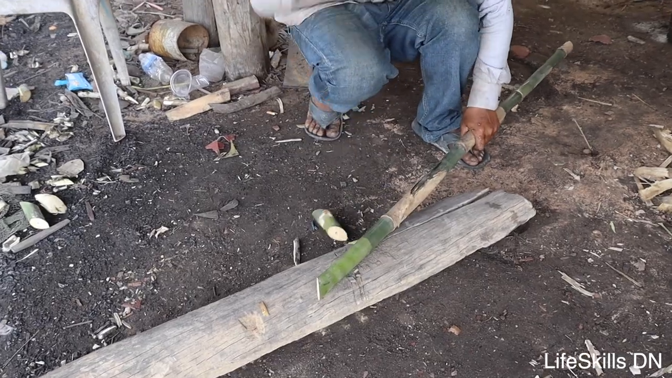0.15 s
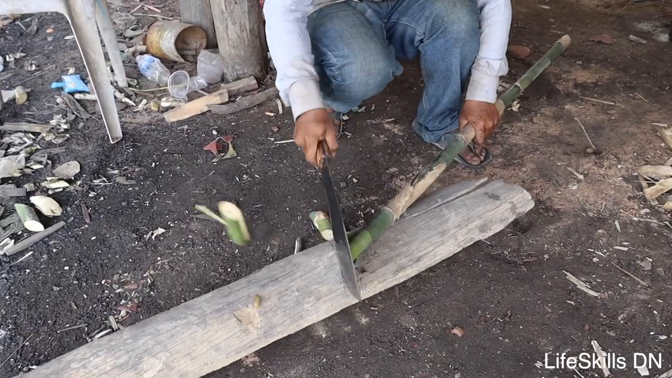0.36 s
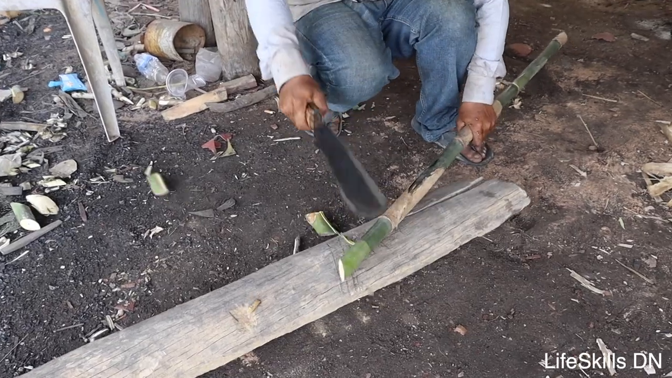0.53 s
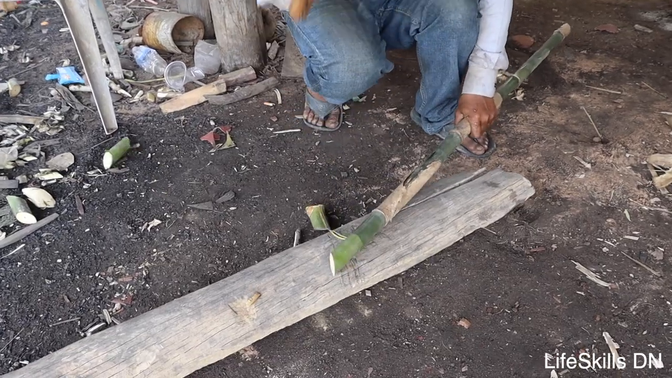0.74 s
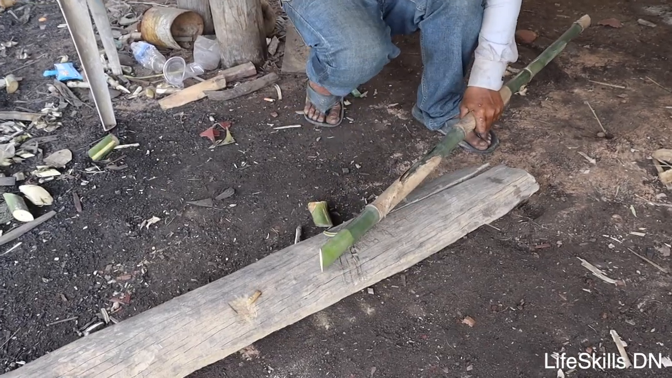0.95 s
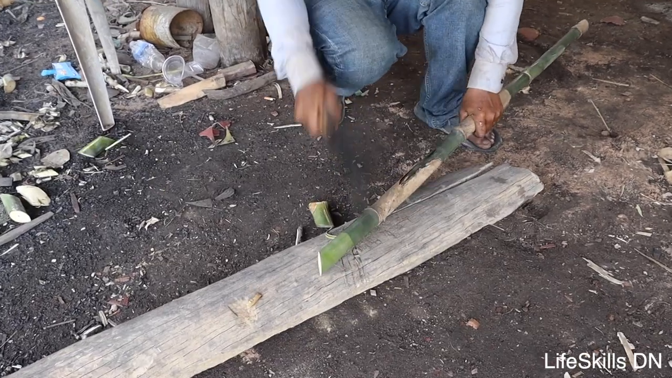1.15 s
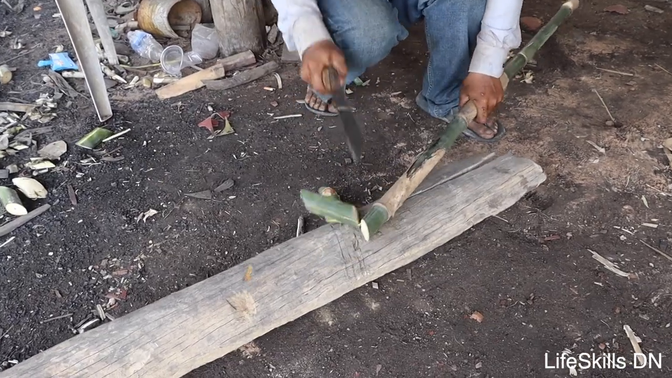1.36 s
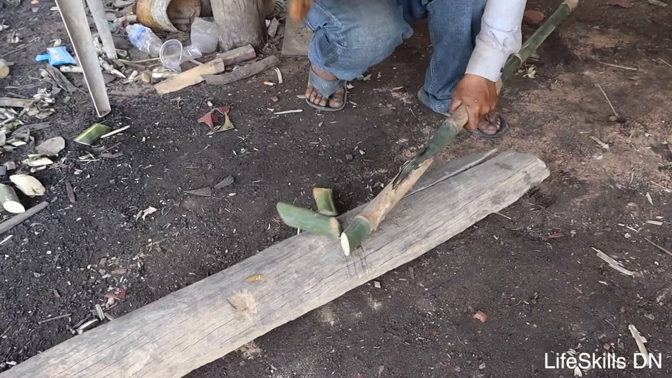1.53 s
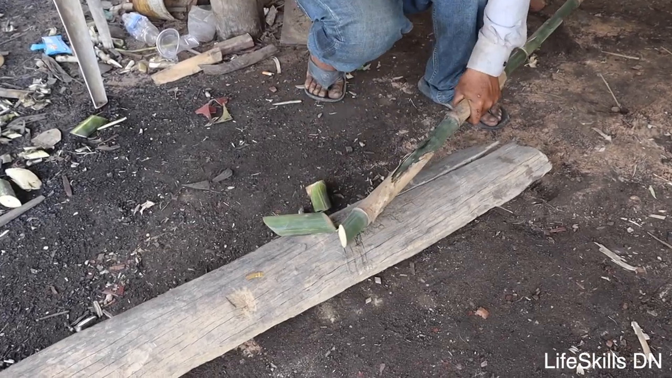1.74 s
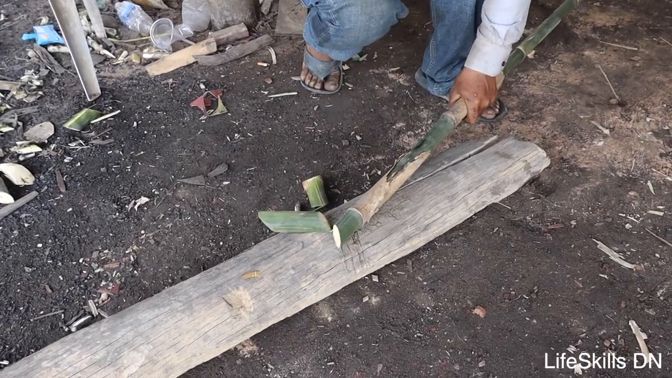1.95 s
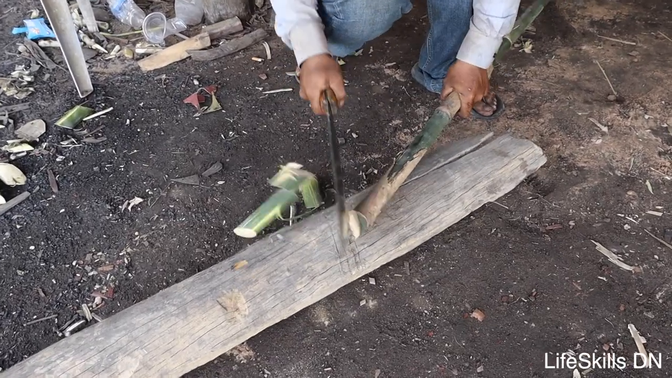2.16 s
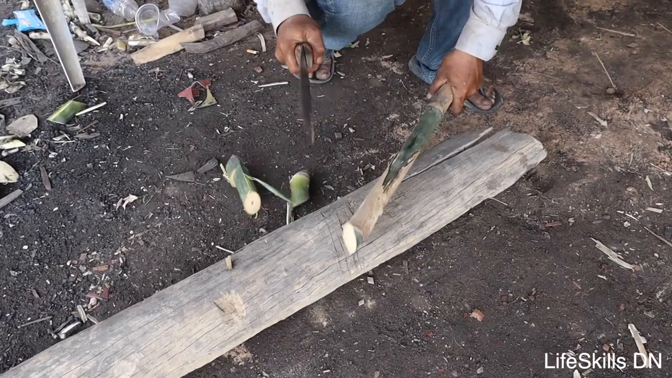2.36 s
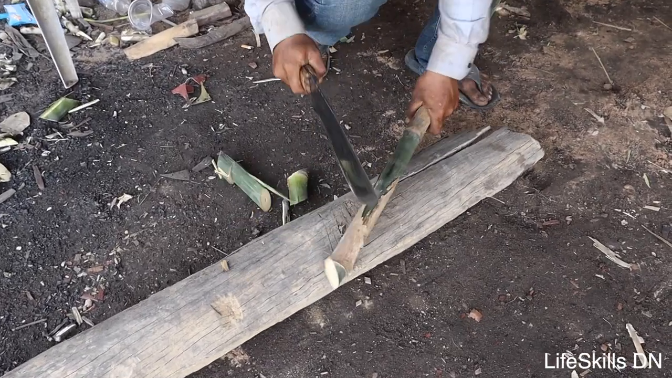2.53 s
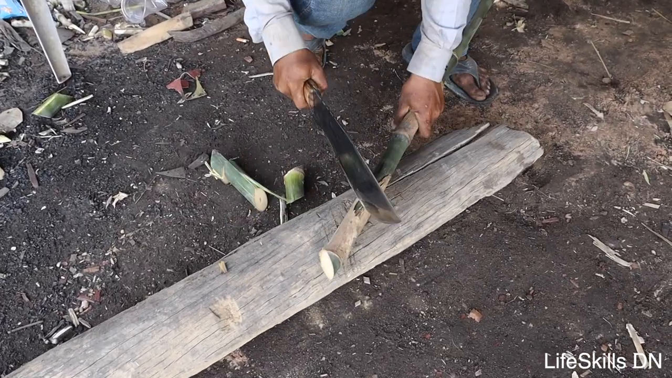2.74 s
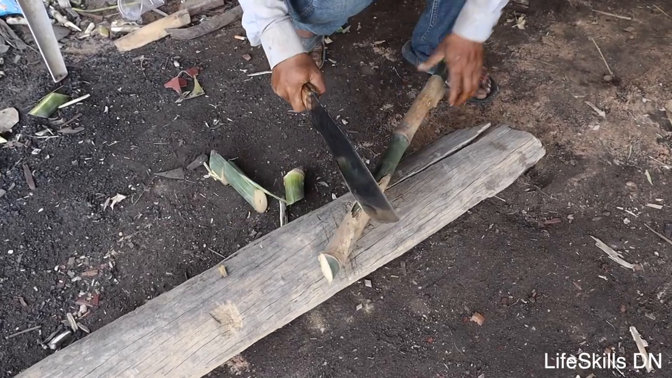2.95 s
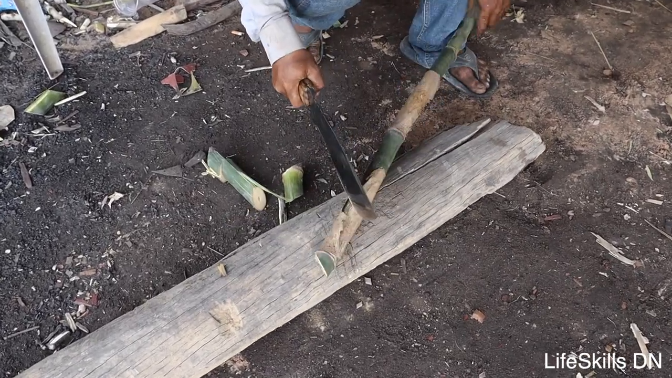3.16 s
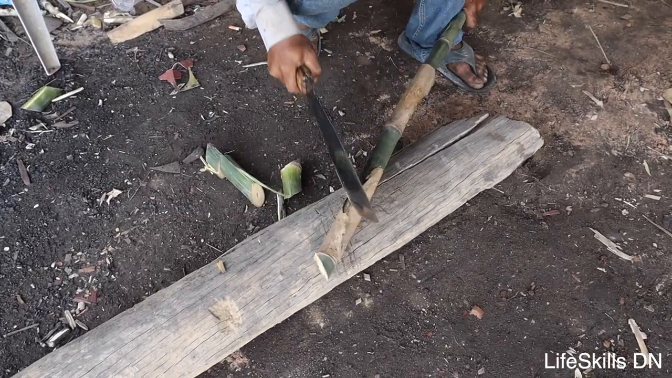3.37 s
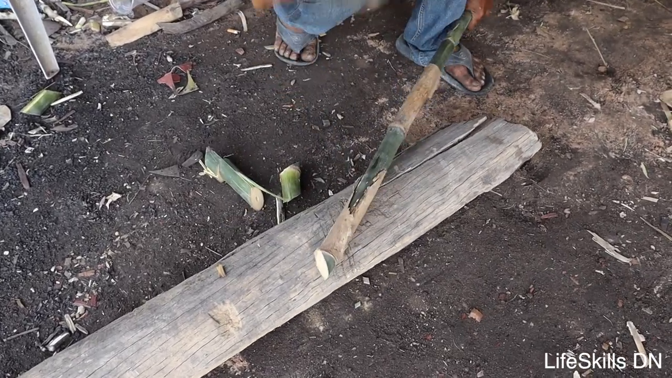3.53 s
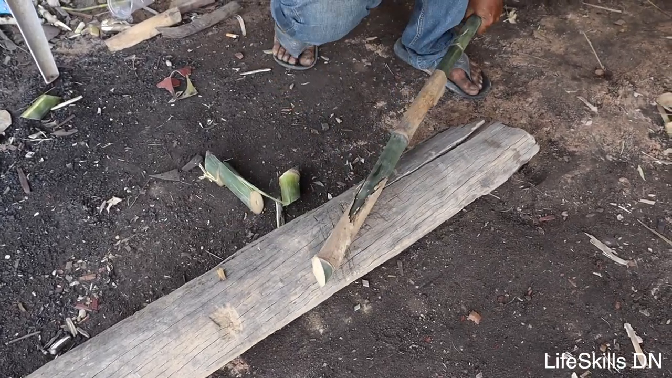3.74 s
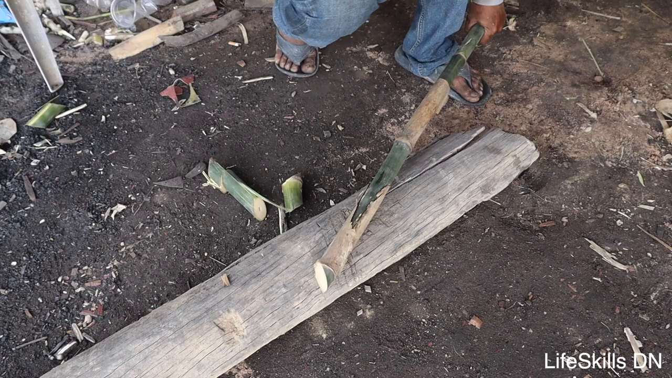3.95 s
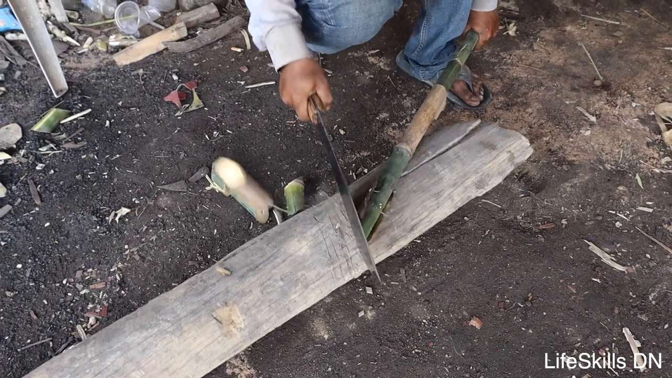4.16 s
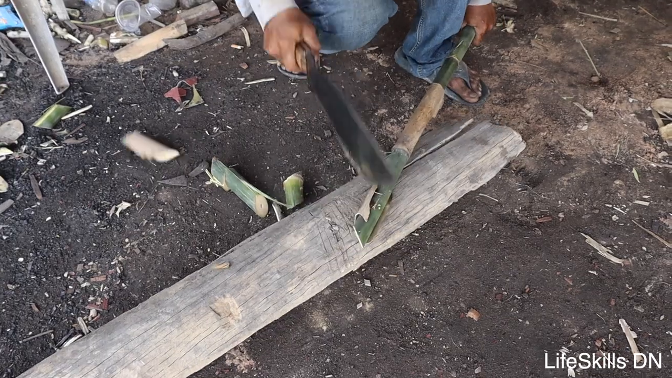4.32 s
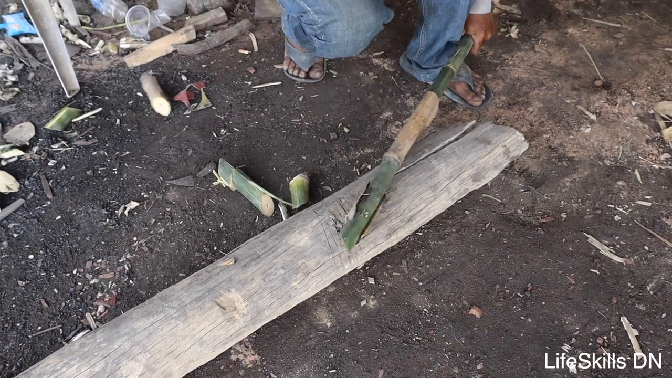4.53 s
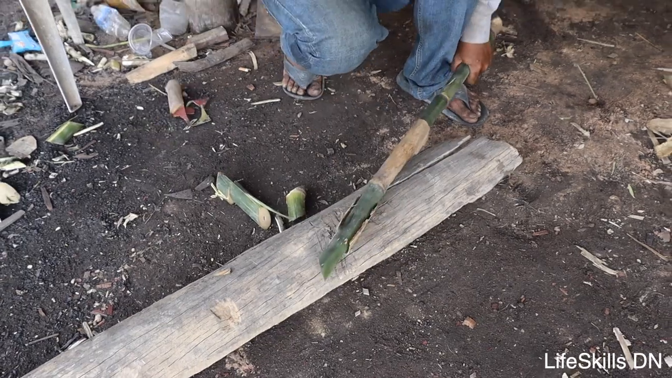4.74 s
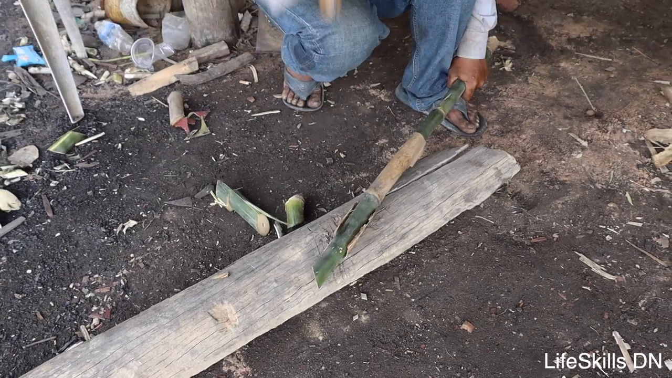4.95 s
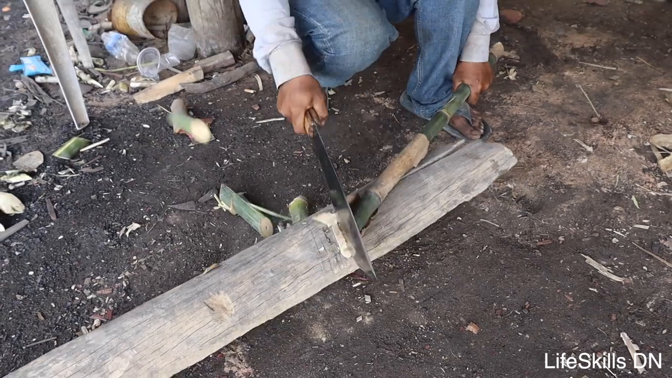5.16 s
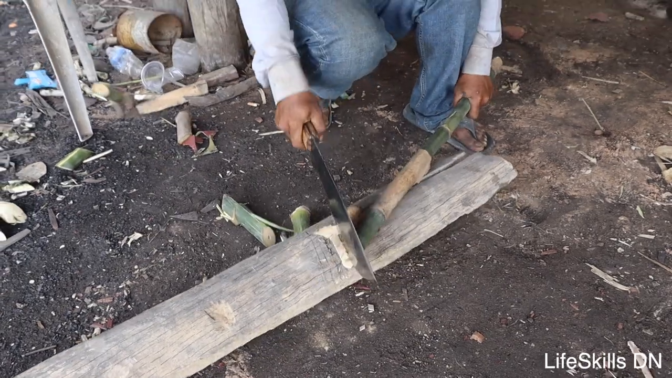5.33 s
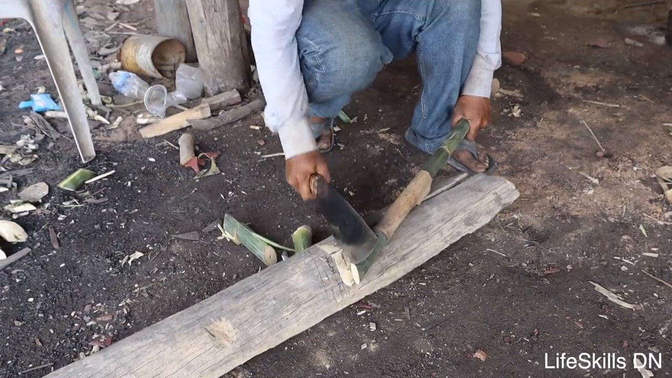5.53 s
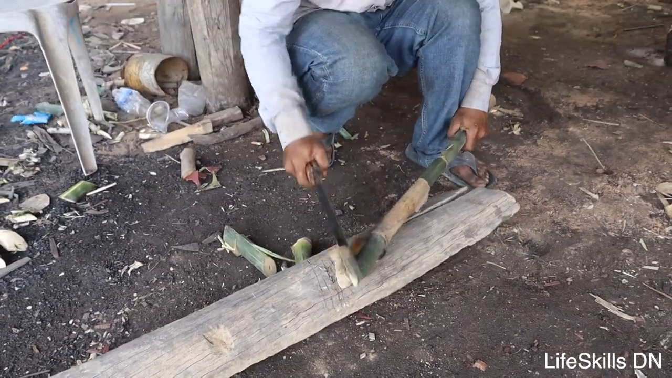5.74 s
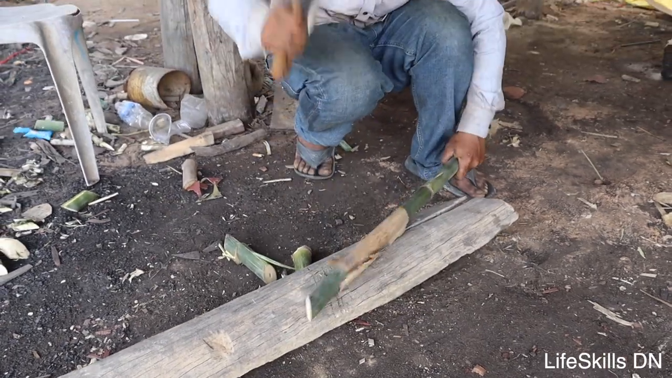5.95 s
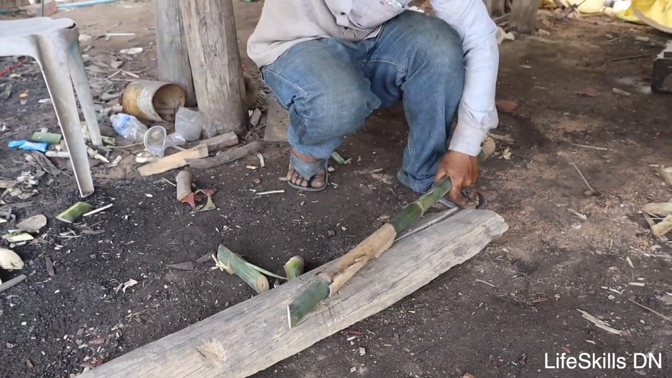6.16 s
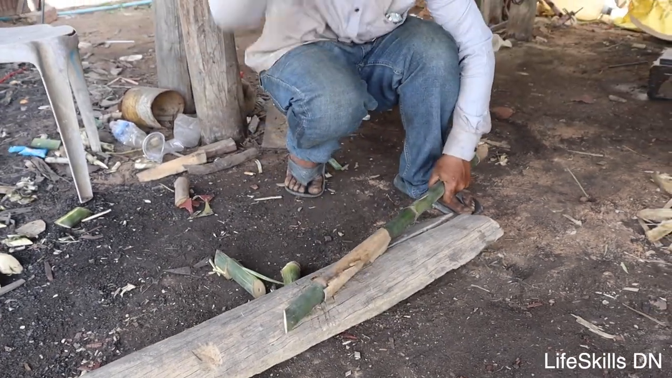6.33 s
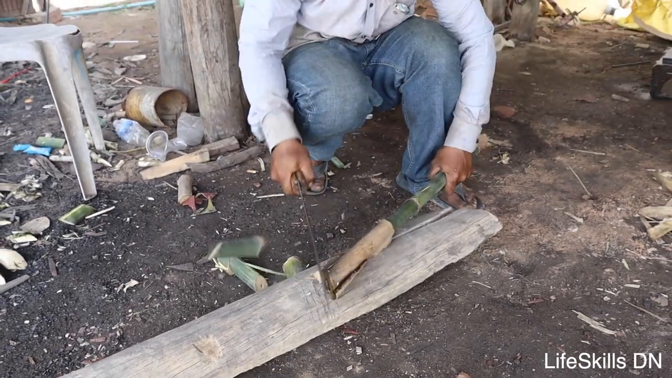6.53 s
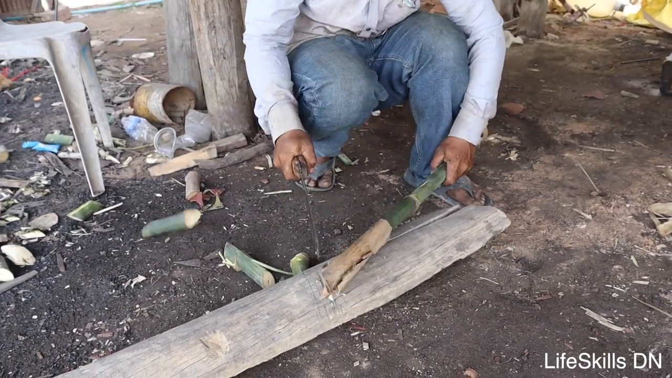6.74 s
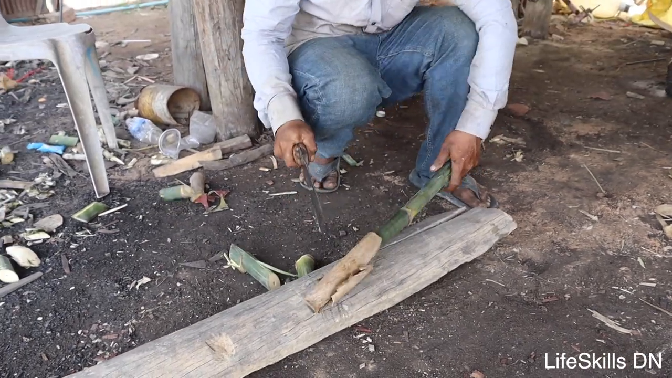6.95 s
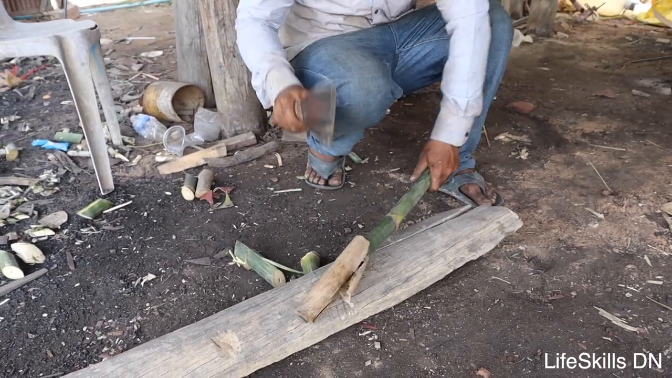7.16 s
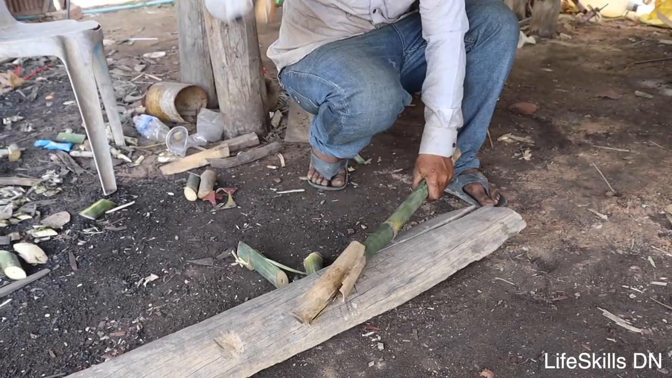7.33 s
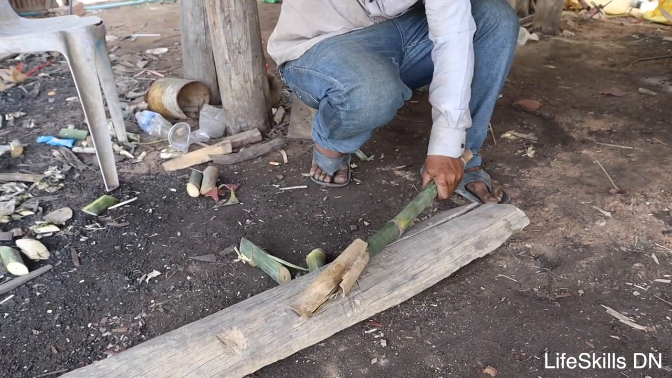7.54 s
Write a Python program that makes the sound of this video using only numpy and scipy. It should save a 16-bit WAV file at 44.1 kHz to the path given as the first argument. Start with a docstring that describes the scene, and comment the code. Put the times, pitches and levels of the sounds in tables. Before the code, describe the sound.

Close to the microphone, a heavy knife cracks through a green bamboo pole and thumps the plank beneath, six times at uneven intervals. Between blows, offcuts knock, the blade taps lightly, and the pole scrapes over wood and grit. An open shed and yard return a quick woody echo, over low outdoor rumble and faint distant whistles.

```python
"""Chopping green bamboo under an open shed

A heavy knife chops a bamboo pole on a plank lying on the ground, close to the microphone.
Noise bursts crack the fibres, then ringing modes thump the plank; shed and yard answer with dying noise.
Between blows, noise bursts and short rings make knocks, clonks and taps; grainy noise makes the slides.
Chips tick and far whistles sound over outdoor air; loud bursts duck the gain, which swells back over the echo."""
import sys
import numpy as np
from scipy import signal
from scipy.fft import rfft, irfft, next_fast_len
from scipy.io import wavfile
from scipy.ndimage import uniform_filter1d

SR = 44100
rng = np.random.default_rng(int(sys.argv[2]) if len(sys.argv) > 2 else 0)


def transcribe(signal):
    """Save signal, clipped to [-1, 1], as a 16-bit WAV file at the path in sys.argv[1]."""
    frames = np.atleast_2d(signal).T
    limited = np.clip(frames, -1, 1)
    pcm = np.round(limited * 32767).astype(np.int16)
    wavfile.write(sys.argv[1], SR, pcm)


N = 334719  # length of the scene in samples

# colour of a gritty tick: hz, relative_db (per Hz)
TICK_COLOUR = [(2000, -4), (4500, 3.5), (8000, 3.5), (13000, -4), (16000, 0)]
# how long the shed's quick answer lasts: hz, t60_s
SHED_DECAY = [(150, 0.19), (700, 0.25), (2000, .17), (6000, 0.17), (14000, 0.082)]
# how long the yard's answer lasts: hz, t60_s
YARD_DECAY = [(150, 1), (700, 0.93), (2000, 0.68), (6000, 1), (14000, 1)]


def amp(db):
    """Decibels to gain."""
    return 10 ** (np.asarray(db) / 20)


def unit(x):
    """Scale to rms 1."""
    return x / np.sqrt(np.mean(x ** 2) + 1e-20)


def along(points, hz):
    """Read a curve of (Hz, value) points on a log frequency axis."""
    f, v = np.transpose(points)
    return np.interp(np.log(hz + 1), np.log(f + 1), v)


def filtered(x, response):
    """Multiply the spectrum of x by a response of frequency."""
    size = x.shape[-1]
    padded = next_fast_len(size + 8192)  # room for the filter to ring out
    spectrum = rfft(x, padded) * response(np.fft.rfftfreq(padded, 1 / SR))
    return irfft(spectrum, padded)[..., :size]


def wobble(rate, size):
    """A wandering random curve, rate knots a second."""
    knots = rng.standard_normal(int(size * rate / SR) + 4)
    return np.interp(np.arange(size) * rate / SR, np.arange(len(knots)), knots)


def noise(spectrum, size, grain_db):
    """Coloured mid and side noise of rms 1, clumped into millisecond grains."""
    grains = rng.standard_normal((2, size)) * amp(grain_db * wobble(900, size))
    return unit(filtered(grains, lambda hz: amp(along(spectrum, hz))))


def fade(t, t60):
    """Silent before t = 0, then dying by 60 dB in t60 seconds (at least 1 ms)."""
    return (t >= 0) * amp(-60 * np.maximum(t, 0) / max(t60, .001))


def ring(t, hz, t60):
    """One struck mode: a sine that dies exponentially."""
    return np.sin(2 * np.pi * hz * t) * fade(t, t60)


def add(track, s, sound):
    """Mix a sound into the track at time s."""
    part = track[..., round(s * SR):][..., :sound.shape[-1]]
    part += sound[..., :part.shape[-1]]


def diffuse(spectrum, decay):
    """A fresh mid and side tail; it builds up within milliseconds and each frequency dies at its own speed."""
    size = int(SR * max(t60 for hz, t60 in decay))
    hz, t, z = signal.stft(noise(spectrum, size, grain_db=1), SR, nperseg=256)
    dying = amp(-60 * t / along(decay, hz)[:, None])
    build_up = 1 - fade(t, .04)
    return signal.istft(z * dying * build_up, SR, nperseg=256)[1]


def in_shed(x, shed_db, yard_db):
    """Add the quick answer of the shed and the long one of the yard, spread out from the mid signal."""
    # what the surroundings reflect: hz, relative_db
    wall_colour = [(100, 1), (700, -7.5), (3000, -3), (14000, 1.5)]
    out = x.copy()
    for db, decay in (shed_db, SHED_DECAY), (yard_db, YARD_DECAY):
        tail = diffuse(wall_colour, decay)
        tail = tail / np.linalg.norm(tail[0])
        add(out, 0, amp(db) * signal.fftconvolve(x[:1], tail, axes=1))
    return out


def bass_cut(x, low_hz):
    """Cut the deep bass, so the blows and thuds stay light below a few hundred Hz."""
    return signal.lfilter(*signal.butter(2, low_hz, "high", fs=SR), x)


def air():
    """Outdoor background: a restless low rumble under a smooth hiss, both of filtered noise."""
    # colour of the background: hz, relative_db (per Hz)
    air_colour = [(15, -34), (25, -7.5), (127, -5.5), (242, -15.5), (270, -15), (301, -16.5), (714, -20.5),
                  (775, -21), (988, -24.5), (1610, -27), (2690, -31), (5280, -37), (6740, -36),
                  (8590, -39.5), (16000, -43)]
    # course of the low rumble: time_s, relative_db
    rumble_course = [(0, 1), (1.0, .5), (2.0, 1.5), (2.8, 2.5), (3.8, -2.5), (5.0, -0.5), (6.3, -1.5),
                     (7.6, -1.5)]
    steady = filtered(noise(air_colour, N, grain_db=-0.5), lambda hz: hz ** 4 / (hz ** 4 + 33 ** 4))
    rumble = filtered(steady, lambda hz: 1 / (1 + (hz / 220) ** 4))
    rumble_db = np.interp(np.arange(N) / SR, *np.transpose(rumble_course)) + 1.1 * wobble(14, N)
    return amp(-40) * (steady + rumble * (amp(rumble_db) - 1))


def crumbs():
    """Chips and grit tick faintly at random, each a short grainy noise burst."""
    out, t = np.zeros((2, N)), np.arange(SR // 20) / SR
    per_s, typical_db, spread_db, t60_s = 3.2, -43, 6, 0.056
    for s in rng.uniform(0, N / SR, int(per_s * N / SR)):
        tick = fade(t, t60_s) * noise(TICK_COLOUR, len(t), grain_db=9)
        add(out, s, amp(rng.normal(typical_db, spread_db)) * tick)
    return out


def plank(t, pitch):
    """The plank's modes ring together, at slightly new strengths for every blow."""
    # modes of the plank at pitch ratio 1: hz, level_db, t60_s
    plank_modes = [(284, -41, 0.13), (371, -17, 0.11), (506, -12.5, 0.069), (540, -4.5, 0.043),
                   (690.5, 1.5, 0.055), (769, -1, 0.062), (903, -11.5, 0.046), (1050, -32, 0.02)]
    return sum(amp(db + rng.normal(0, 2.7)) * ring(t, hz * pitch, t60) for hz, db, t60 in plank_modes)


def chops():
    """Fibres crack while the edge passes through the tube; then the blade lands on the plank and rebounds."""
    # the blows: start_s, crack_db, cutting_s, tube_hz, tube_db, splintering_db, plank_db,
    # plank_pitch_ratio, rebound_delay_s, rebound_db (relative to the landing), echo_db
    blows = [(0.2996, 11.5, 0.0043, 1810, -3.5, -15, 13.5, 0.91, 0.0076, -3.5, 9.5),
             (1.2213, 9.5, 0.0042, 1334, 7, 0, 4, 0.98, 0.0052, 4.5, 2.5),
             (2.107, 5.5, .006, 1420, -23, -10, 8, 0.97, .008, -3.5, 3.5),
             (4.1131, 6.5, 0.0045, 1420, 1, -5, 13, 1.07, 0.0094, -5, 6),
             (5.0752, 10, 0.0054, 1440, 0, -1.5, 9.5, 0.95, 0.0076, -3.5, 7),
             (6.4926, 6, 0.005, 1336, 9.5, 2.5, -1, 0.96, .031, -2.5, 3)]
    # colour of the crack: hz, relative_db (per Hz)
    crack_colour = [(60, 9), (300, 0), (700, 4.5), (1200, -5), (2500, -6), (4500, -10), (8000, -10.5),
                    (13000, -13.5), (16000, -15)]
    # colour of the splintering: hz, relative_db (per Hz)
    splinter_colour = [(200, -29), (600, -25.5), (2000, -2.5), (4000, -9.5), (8000, -14), (16000, -21)]
    # modes of the split tube: ratio_to_tube_hz, level_db, t60_s
    tube_modes = [(1.001, -3, 0.045), (1.65, -0.5, 0.017), (2.7, -9, 0.041)]
    # colour of the near echo: hz, relative_db (per Hz)
    near_colour = [(80, -20), (220, -20), (340, -4.5), (430, -10.5), (580, 0.5), (770, -1), (1050, -6),
                   (2000, -15.5), (4000, -20), (8000, -26), (16000, -33)]
    # colour of the far echo: hz, relative_db (per Hz)
    far_colour = [(100, -26.5), (300, -4), (450, -6), (600, 0), (780, 0), (1100, -8), (2000, -12.5),
                  (4000, -20), (8000, -30), (16000, -38.5)]
    far_echo_db = -21.5  # the yard's wash, relative to the near echo
    out, t = np.zeros((2, N)), np.arange(SR // 4) / SR
    for (s, crack_db, cut, tube_hz, tube_db, splinter_db, plank_db,
         pitch, delay, rebound_db, echo_db) in blows:
        cutting = fade(np.maximum(t - cut, 0), 0.007)  # full until the edge is through
        side_gain = amp([[0], [-12]])  # the crack's side channel is held back
        blow = amp(crack_db) * cutting * noise(crack_colour, len(t), grain_db=4.5) * side_gain
        blow += amp(splinter_db) * fade(t, 0.17) * noise(splinter_colour, len(t), grain_db=-1.5)
        tube = sum(amp(db) * ring(t, ratio * tube_hz, t60) for ratio, db, t60 in tube_modes)
        landing = plank(t - cut, pitch)
        rebound = amp(rebound_db) * plank(t - cut - delay, pitch)
        blow[0] += amp(tube_db) * tube + amp(plank_db) * (landing + rebound)
        add(out, s, bass_cut(blow, low_hz=247))
        # the blow returns from all sides at once, blurred into an uneven wash in the plank's colour
        add(out, s, amp(echo_db) * diffuse(near_colour, SHED_DECAY))
        far = diffuse(far_colour, YARD_DECAY)
        uneven_db = 2.6 * wobble(43.7, far.shape[1])
        add(out, s, amp(echo_db + far_echo_db + uneven_db) * far)
    return out


def knocks():
    """Pole, blade and offcuts bump the plank and ground: a dull thud, a woody clack and a gritty tick."""
    # the bumps: start_s, thud_db, clack_db, tick_db
    bumps = [(0.41, -37, -40, -22.5), (0.474, -33, -26, -25.5), (1.598, -26, -37, -44),
             (2.374, -32.5, -39, -34), (2.496, -27, -45, -38), (2.56, -34.5, -39, -26.5),
             (2.704, -23.5, -25.5, -27), (2.714, -24.5, -39, -45), (2.831, -53, -54, -40.5),
             (3.367, -46, -40.5, -35.5), (3.5325, -47, -34.5, -39), (4.224, -48, -19.5, -21.5),
             (4.354, -30, -45, -31.5), (4.411, -29.5, -50, -31), (5.325, -31, -20.5, -28),
             (5.363, -31, -22.5, -15.5), (5.5044, -17, -18, -33), (5.513, -15, -24, -35),
             (5.542, -19.5, -28, -42), (5.8135, -34.5, -35, -29), (5.948, -44, -39, -39),
             (6.0166, -11, -22.5, -28), (6.025, -11, -29, -39), (6.727, -50, -44, -34),
             (7.1, -57, -37, -42)]
    # colour of the thud: hz, relative_db (per Hz)
    thud_colour = [(60, -40), (150, -4), (320, 4.5), (450, 5), (620, -0.5), (820, -2.5), (1200, -18),
                   (3000, -46)]
    # colour of the clack: hz, relative_db (per Hz)
    clack_colour = [(400, -16), (1000, 7), (1500, 4), (2500, 3), (3600, 0.5), (5000, -9), (8000, -25)]
    thud_t60_s, clack_t60_s, tick_t60_s = 0.13175, 0.06375, 0.06715
    out, t = np.zeros((2, N)), np.arange(SR // 6) / SR
    contact = fade(t, 0.0083)  # a sharp first touch
    for s, thud_db, clack_db, tick_db in bumps:
        thud = amp(thud_db) * fade(t, thud_t60_s) * noise(thud_colour, len(t), grain_db=-1.5)
        clack = amp(clack_db) * (contact + fade(t, clack_t60_s)) * noise(clack_colour, len(t), grain_db=6.0)
        tick = amp(tick_db) * (contact + fade(t, tick_t60_s)) * noise(TICK_COLOUR, len(t), grain_db=7.5)
        add(out, s, bass_cut(thud, low_hz=205) + clack + tick)
    return out


def slides():
    """Grainy friction: the pole or a piece, or a sleeve as the arm swings, speeds up, then slows; it rasps on
    wood and hisses over grit."""
    # the strokes: start_s, speeding_up_s, slowing_t60_s, rasp_db, hiss_over_rasp_db
    strokes = [(0.47, 0.015, 0.58, -34, -3), (1.0, 0.27, .9, -42, -7.5), (1.42, 0.047, 0.38, -49.5, 2),
               (1.558, 0.02, 0.27, -38, -0.5), (2.33, 0.04, 0.65, -44.5, 0.5), (2.63, 0.073, 0.16, -43, 5),
               (2.85, 0.018, 0.11, -55.5, 12), (2.95, 0.16, .6, -49.5, -1.5), (3.355, 0.051, 0.11, -48, 8),
               (3.48, 0.04, 0.43, -54.5, 14), (4.222, 0.01, 0.3, -30, 1), (4.35, 0.014, 0.14, -38, 7.5),
               (4.45, .05, 0.17, -42, 7.5), (4.53, 0.072, 0.92, -43.5, 13.5),
               (4.74, 0.097, 0.19, -47.5, 12), (4.96, 0.021, 0.42, -44.5, -7.5),
               (5.322, 0.0066, 0.3, -28, -5.5), (5.41, 0.096, 0.43, -33, -1),
               (5.656, 0.074, 0.26, -31.5, -4), (5.811, .006, 0.23, -31.5, -5),
               (5.94, .05, 0.86, -38.5, -2), (6.74, 0.12, .4, -44.5, -0.5), (6.87, 0.03, 0.69, -32, -1),
               (7.091, .015, 0.7, -37.5, -0.5), (7.13, 0.12, 0.18, -50, 8), (7.43, 0.0091, 0.15, -43.5, -9),
               (7.5, .035, 0.11, -42, -5.5)]
    # colour of the rasp: hz, relative_db (per Hz)
    rasp_colour = [(300, -23), (900, -3.5), (1700, 1), (3000, 1.5), (4500, -7.5), (8000, -28)]
    # colour of the hiss: hz, relative_db (per Hz)
    hiss_colour = [(2000, -12), (4200, -2), (7000, -3.5), (12000, -9), (16000, -10.5)]
    push_power = 0.8  # how loudness grows while a slide speeds up
    t = np.arange(N) / SR
    rasp, hiss = np.zeros(N), np.zeros(N)
    for s, rise, t60, db, hiss_db in strokes:
        speeding_up = np.clip((t - s) / rise, 0, 1) ** push_power
        slowing = fade(np.maximum(t - s - rise, 0), t60)
        stroke = amp(db) * speeding_up * slowing
        # overlapping strokes add in power
        rasp, hiss = np.hypot(rasp, stroke), np.hypot(hiss, amp(hiss_db) * stroke)
    catching = amp(1.8 * wobble(70, N))
    on_wood = rasp * noise(rasp_colour, N, grain_db=3)
    over_grit = hiss * noise(hiss_colour, N, grain_db=2.5)
    return catching * (on_wood + over_grit)


def whistles():
    """Thin far tones, blurred by the distance: a gliding carrier times slow random curves."""
    # the calls: middle_s, length_s, pitch_hz (at the middle), glide_hz_per_s, width_hz, level_db
    calls = [(1.15, .28, 2720, 0, 220, -45), (3.12, .12, 2650, -500, 240, -48),
             (6.17, .17, 2540, -2600, 170, -45), (6.32, .32, 1460, -200, 14, -50)]
    out, t = np.zeros((2, N)), np.arange(N) / SR
    for s, length, hz, glide, width_hz, db in calls:
        u = t[np.abs(t - s) < length / 2] - s  # seconds from the middle
        blur = wobble(2 * width_hz, len(u)) + 1j * wobble(2 * width_hz, len(u))
        carrier = np.exp(2j * np.pi * (hz + glide * u / 2) * u)
        swell = np.cos(np.pi * u / length)
        add(out[0], s - length / 2, amp(db) * swell * unit(np.real(blur * carrier)))
    return out


def blade_taps():
    """The hand-held steel rings briefly and roughly; where it touches the pole decides which modes speak."""
    # modes of the steel blade: hz, level_db, t60_s
    blade_modes = [(1480, -1, .07), (2590, 1.5, 0.054), (3040, -3, .05), (3406, -1, 0.088), (4180, 0, .14),
                   (5450, -4, .08)]
    # touches on the pole: start_s, level_db, most_excited_hz
    touches = [(2.558, -31, 2600), (2.702, -22.5, 3050), (3.533, -30.5, 2480), (5.362, -24, 4300)]
    chatter_rad = 0.95  # phase jitter while the edge rattles on the bamboo
    fall_db_per_octave = 23  # away from the most excited pitch
    out, t = np.zeros((2, N)), np.arange(SR // 4) / SR
    for s, db, centre_hz in touches:
        for hz, mode_db, t60 in blade_modes:
            rattling = chatter_rad * wobble(506, len(t))
            tone = np.sin(2 * np.pi * hz * t + rattling) * fade(t, t60)
            off_centre_db = fall_db_per_octave * abs(np.log2(hz / centre_hz))
            add(out[0], s, amp(db + mode_db - off_centre_db) * tone)
    return out


def clonks():
    """A hollow piece lands or rocks: a short ring, with chattering noise around the same pitch."""
    # the landings: start_s, pitch_hz, ring_db, chatter_db, chatter_t60_s
    landings = [(2.714, 345, -21, -35, 0.2), (5.489, 1423, -8, -30, 0.11), (5.505, 2100, -16, -23, 0.099),
                (5.508, 1130, -13.5, -14, 0.12), (5.513, 714, -12, -16.5, 0.17),
                (5.54, 694, -8.5, -23, 0.12), (6.023, 390, -12, -24, 0.073), (6.104, 800, -29, -24.5, 0.2),
                (6.12, 720, -29, -24.5, 0.19), (6.742, 1300, -9, -24.5, 0.063)]
    out, t = np.zeros((2, N)), np.arange(SR // 6) / SR
    for s, hz, ring_db, chatter_db, t60 in landings:
        # chatter colour: (Hz, relative dB per Hz), peaked at the ring's pitch
        hollow = [(hz / 3, -40), (hz / 1.4, -13), (hz, 0), (hz * 1.4, -13), (hz * 4, -40), (hz * 8, -60)]
        clonk = amp(chatter_db) * fade(t, t60) * noise(hollow, len(t), grain_db=4.0)
        clonk[0] += amp(ring_db) * ring(t, hz, 0.28 * t60)  # the ring dies sooner
        add(out, s, clonk)
    return out


def stereo(pair, width):
    """Mid and side to left and right, with the side shaped by width."""
    mid, side = pair[0], filtered(pair[1], lambda hz: amp(along(width, hz)))
    return np.array([mid + side, mid - side])


def scene():
    """Sources in front of a close microphone pair: near mono in the bass, wider treble; wide air around."""
    # side level of the sounds in front: hz, side_db
    front_width = [(60, -26), (300, -28), (700, -22), (1300, -27.5), (2700, -17), (5500, -5), (12000, -1)]
    # side level of the background from all around: hz, side_db
    around_width = [(60, -22), (130, -18.5), (300, -10.5), (700, -11.5), (1400, -12), (2800, -6),
                    (5500, -2), (12000, -1)]
    handling = in_shed(knocks() + clonks() + blade_taps() + slides(), shed_db=-5.5, yard_db=-12)
    front = chops() + handling + crumbs()
    return stereo(front, front_width) + stereo(air() + whistles(), around_width)


def gain_control(x, threshold_db, release_db_per_s, attack):
    """Power over the threshold pulls the gain down within milliseconds; it climbs back steadily."""
    detector_s = 0.0027  # power is averaged over this time
    power = np.abs(uniform_filter1d(np.mean(x ** 2, axis=0), max(round(detector_s * SR), 1)))
    excess = np.maximum(10 * np.log10(power + 1e-12) - threshold_db, 0)
    # hold each peak of the excess, letting it sink at the release speed
    ramp = release_db_per_s * np.arange(N) / SR
    held = np.maximum.accumulate(excess + ramp) - ramp
    keep = np.exp(-1 / (attack * SR))
    reduction_db = signal.lfilter([1 - keep], [1, -keep], held)
    return x * amp(-reduction_db)


def record(dry):
    """The gain ducks with a lag (attack in seconds), peaks past full scale clip, then the top is cut."""
    ducked = gain_control(dry, threshold_db=-6.0, release_db_per_s=82.5, attack=0.002)
    clipped = np.clip(ducked, -1, 1)
    top_hz = 15950
    return filtered(clipped, lambda hz: 1 / (1 + (hz / top_hz) ** 120))


dry = scene()
out = record(dry)
transcribe(out)
```